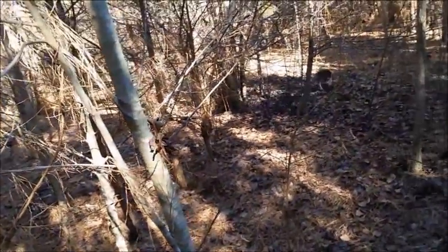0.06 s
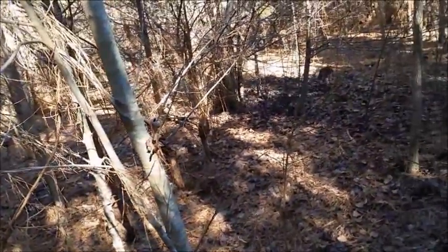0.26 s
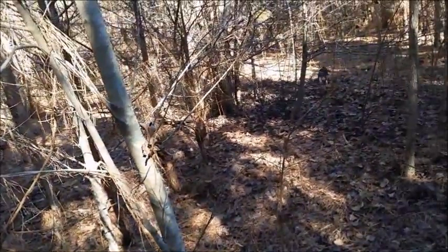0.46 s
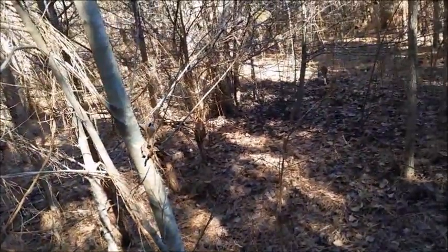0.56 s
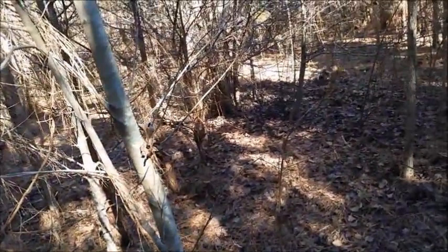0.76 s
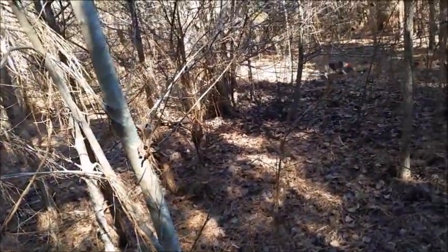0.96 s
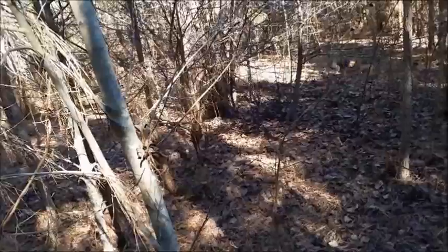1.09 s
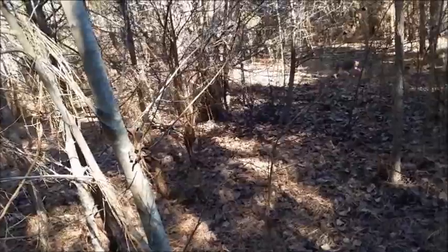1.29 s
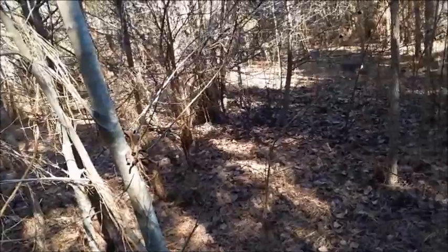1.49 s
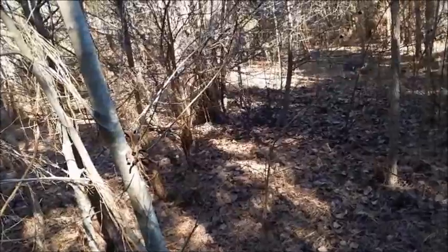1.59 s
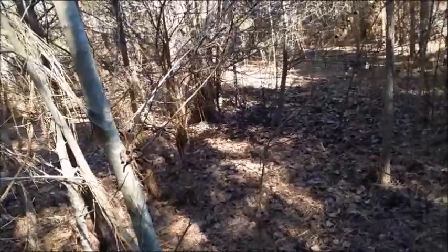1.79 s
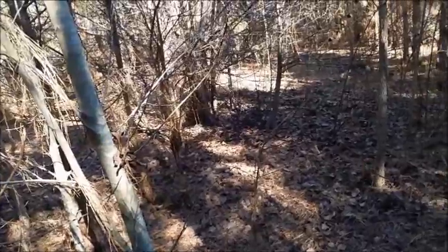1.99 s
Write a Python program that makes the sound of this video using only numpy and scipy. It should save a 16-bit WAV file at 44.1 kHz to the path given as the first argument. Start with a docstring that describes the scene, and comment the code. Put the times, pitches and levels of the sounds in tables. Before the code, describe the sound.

A young hound bays high and slightly hoarse, then again shorter, some way off among trees with a thin echo; dry leaves and clothing rustle close to a hand-held stereo microphone, then two low taps on its right.

```python
"""Young hound baying in an open wood

A young hound bays twice, some way off; each bay is harmonics on a gliding pitch, roughened by a
second oscillation, and the trunks return a thin echo made of decaying noise. Dry leaves and clothing
rustle close by as crackles over hiss. Shaped noise gives insects on the left, far traffic and wind
rumble, and faint air. A finger taps the right of the hand-held recorder: short low sagging tones.
Soft thumps, a lower swish and a thin whistle pass briefly."""
import sys
import numpy as np
from scipy import signal
from scipy.fft import rfft, irfft, next_fast_len
from scipy.io import wavfile
from scipy.ndimage import map_coordinates

SR = 44100
rng = np.random.default_rng(int(sys.argv[2]) if len(sys.argv) > 2 else 0)


def gain_from_db(level_db):
    """Turn a decibel level (scalar or array-like) into a linear amplitude factor."""
    decades = np.asarray(level_db, float) / 20
    return 10 ** decades


def master_out(mix):
    """Clip the mix to full scale and print it as 16-bit PCM to the path in sys.argv[1]."""
    frames = np.transpose(np.atleast_2d(mix))
    ceiling = np.clip(frames, -1, 1)
    pcm = np.round(ceiling * 32767).astype(np.int16)
    wavfile.write(sys.argv[1], SR, pcm)


N = 90404
T = np.arange(N) / SR


def unit(x):
    """Scaled to rms 1."""
    return x / np.sqrt(np.mean(x ** 2) + 1e-20)


def along(points, hz):
    """Value at hz from (Hz, value) points on a log axis."""
    f, v = np.transpose(points)
    return np.interp(np.log(hz + 1), np.log(f + 1), v)


def curves(rows):
    """One value per sample for each column after the time."""
    s, *cols = np.transpose(rows)
    return [np.interp(T, s, c) for c in cols]


def wobble(rate):
    """A smooth random curve, rate knots a second."""
    return map_coordinates(rng.standard_normal(N // 20), [T * rate])


def bump(s, half):
    """A flat-topped swell of height 1 around a moment."""
    return np.exp(-((T - s) / half) ** 4)


def noise():
    """White noise, independent left and right."""
    return rng.standard_normal((2, N))


def coloured(x, spectrum):
    """x through (Hz, dB) points, brought to rms 1."""
    m = next_fast_len(N + 8192)
    gain = gain_from_db(along(spectrum, np.fft.rfftfreq(m, 1 / SR)))
    return unit(irfft(rfft(x, m) * gain, m)[..., :N])


def delayed(x, seconds):
    """x later by any fraction of a sample."""
    m = next_fast_len(N + 8192)
    turn = np.exp(-2j * np.pi * np.fft.rfftfreq(m, 1 / SR) * seconds)
    return irfft(rfft(x, m) * turn, m)[..., :N]


def pair(a, b, alike):
    """Left and right from two noises, with the given likeness."""
    u = np.arccos(np.clip(alike, -1, 1)) / 2
    return np.array([np.cos(u) * a + np.sin(u) * b, np.cos(u) * a - np.sin(u) * b])


def fade_db():
    """The slow fall shared by the background beds, ending at 0 dB."""
    return -2.5 * (T - T[-1])  # dB per second


# colour of the air all around: hz [Hz], density_db [dB per Hz, relative]
AIR_COLOUR = [(150, -44), (300, -3), (900, -13.5), (5400, -18), (6200, -50), (9300, -50.5), (10800, -13.5)]


def air():
    """Wide faint hiss: separate shaped noise at each microphone."""
    return gain_from_db(-61.5 + fade_db()) * coloured(noise(), AIR_COLOUR)


# colour of the far traffic and wind: hz [Hz], density_db [dB per Hz, relative]
RUMBLE_COLOUR = [(10, -24.5), (60, -9.5), (100, -3.5), (150, -15.5), (320, -29), (600, -55.5), (1500, -80)]


def rumble():
    """Low noise partly shared by both sides; the left drifts slowly, the right flickers."""
    both = pair(*coloured(noise(), RUMBLE_COLOUR), alike=.45)
    unsteady_db = 1.3 * np.array([wobble(4.3), wobble(45)])
    return both * gain_from_db(-51.5 + fade_db() + unsteady_db)


# colour of the insects off to the left: hz [Hz], density_db [dB per Hz, relative]
INSECT_COLOUR = [(2200, -60.5), (2950, -12), (3400, -5.5), (4150, -2), (4700, -12), (6000, -68.5)]


def insects():
    """A band of noise, 16.5 dB weaker at the right microphone, with a slow waver."""
    hiss = coloured(noise(), INSECT_COLOUR) * gain_from_db([[0], [-16.5]])
    return hiss * gain_from_db(-58 + fade_db() + 1.1 * wobble(7))


# soft low thumps: middle_s [s], level_db [dB], pitch_hz [Hz], half_length_s [s]
THUMP_EVENTS = [(0.069, -49.5, 310, 0.0085), (1.036, -34, 190.8, 0.01)]


def thumps():
    """A few cycles of a low tone, stronger at the right microphone."""
    mono = sum(gain_from_db(db) * bump(s, half) * np.sin(2 * np.pi * hz * T)
               for s, db, hz, half in THUMP_EVENTS)
    return gain_from_db([[-4], [0]]) * mono


# finger on the right of the case: start_s [s], level_db [dB, before the soft onset],
# pitch_hz [Hz, once settled]
TAP_EVENTS = [(1.4277, -16, 102), (1.6759, -20, 117)]
GLIDE, GLIDE_S = 3.44, 0.0013  # extra pitch at the start, as a share of the settled one; its decay, s
TAP_T60_S, TAP_ONSET_S = 0.045, 0.0011


def taps():
    """Each tap rings the case low and short, starting sharp and sagging in pitch."""
    out = np.zeros(N)
    for s, db, hz in TAP_EVENTS:
        t = np.clip(T - s, 0, None)
        turns = hz * (t + GLIDE * GLIDE_S * (1 - np.exp(-t / GLIDE_S)))
        onset = 1 - np.exp(-(t / TAP_ONSET_S) ** 2)
        out += gain_from_db(db - 60 * t / TAP_T60_S) * onset * np.sin(2 * np.pi * turns)
    return out * gain_from_db([[-44], [0]])  # left, right, dB


# thin whistle on the left: middle_s [s], half_length_s [s], pitch_hz [Hz], level_db [dB]
WHISTLE_EVENT = (.55, .035, 10600, -52)


def whistle():
    """A brief sine of slightly wandering pitch, at the left microphone only."""
    s, half, hz, db = WHISTLE_EVENT
    tone = np.sin(2 * np.pi * np.cumsum(hz + 40 * wobble(60)) / SR)
    return gain_from_db(db) * bump(s, half) * tone * np.array([[1], [0]])


# colour of the swish: hz [Hz], density_db [dB, relative]
SWISH_SPECTRUM = [(7800, -58.5), (8400, -7.5), (11000, -9.5), (12500, -44.5)]
# the swish towards the left: middle_s [s], half_length_s [s], level_db [dB, left]
SWISH_EVENT = (0.5, .16, -53.5)


def swish():
    """One swell of shaped noise, lower than the leaves and 8 dB weaker on the right."""
    s, half, db = SWISH_EVENT
    return gain_from_db(db) * bump(s, half) * coloured(noise(), SWISH_SPECTRUM) * gain_from_db([[0], [-8]])


# colour of dry leaves close to the microphones: hz [Hz], density_db [dB per Hz, relative]
LEAF_COLOUR = [(8000, -84), (9400, -23), (10400, -5.5), (14000, -1.5)]
# louder leaf snaps: start_s [s], level_db [dB, at the onset, before colouring]
SNAP_EVENTS = [(.608, -42), (1.619, -33)]


def snaps():
    """Sudden noise bursts in the colour of leaves, 60 dB down after 5.8 ms, alike on both sides."""
    sudden = sum(gain_from_db(db - 60 * np.abs(T - s) / 0.0058) * (T >= s) for s, db in SNAP_EVENTS)
    bursts = sudden * rng.standard_normal(N)
    return coloured(bursts, LEAF_COLOUR) * bursts.std()


# movement in the leaves and clothing: time_s [s], strength_db [dB]
MOVEMENT = [(0, -78.5), (.025, -53), (.19, -42.5), (.215, -59), (.26, -38), (.36, -40.5), (.63, -41.5),
            (.655, -46), (.76, -75.5), (.79, -46), (.83, -42.5), (.89, -44.5), (.915, -36), (.97, -43),
            (1.22, -49.5), (1.25, -74), (1.33, -68.5), (1.37, -57.5), (1.45, -72), (1.63, -46.5),
            (1.7, -51.5), (1.76, -76.5), (1.84, -53.5), (1.93, -59), (2.05, -83.5)]
CRACKLES_PER_S, CRACKLE_SPREAD_DB, CRACKLE_DB = 1500, 2.5, -3  # crackle level is relative to the hiss
FLICKER_DB, LEFT_LAG_S = 2.2, .00011


def leaves():
    """Dense crackles over a hiss, both following the movement, plus the louder snaps."""
    sizes = gain_from_db(CRACKLE_SPREAD_DB * rng.exponential(size=(2, N))) * noise()
    crackle = unit(sizes * (rng.random((2, N)) < CRACKLES_PER_S / SR))
    a, b = coloured(noise() + gain_from_db(CRACKLE_DB) * crackle, LEAF_COLOUR)
    strength_db, = curves(MOVEMENT)
    flicker_db = FLICKER_DB * (wobble(28) + wobble(120))
    left, right = gain_from_db(strength_db + flicker_db) * pair(a, b, .45) + snaps()
    return np.array([delayed(left, LEFT_LAG_S), right])


# harmonics of the voice: multiple [x pitch], level_db [dB, fundamental at 0],
# mouth_share [share of the mouth opening it follows]
HARMONICS = [(2, -4, 0.84), (3, -2.5, 0.72), (4, -27, 1), (5, -42, 0.67)]
# the tongue shifts and lets the third harmonic through in patches: time_s [s], gain_db [dB]
TONGUE_SHIFTS = [(.265, -10), (.285, -25.5), (.37, -20), (.385, -9.5), (.44, -21), (.57, -16.5),
                 (.585, -15.5), (.9, -51), (.93, -18.5)]
# partials when alternate cycles differ: multiple [x pitch],
# level_db [dB under the fundamental, at strength 1]
HALF_PARTIALS = [(.5, -37), (1.5, -25), (2.5, -30.5)]
# colour of the breath rasp: hz [Hz], density_db [dB, relative]
RASP_COLOUR = [(250, -38.5), (520, -23.5), (735, -11.5), (1700, -16.5), (2600, -24.5), (4500, -100)]
# the second oscillation alone: middle_s [s], half_length_s [s], level_db [dB]
FLARE_EVENTS = [(0.231, 0.0076, -34.5), (0.58, 0.017, -27.5)]
FLUTTER_SWELL, FLUTTER_BEND_RAD, SECOND_WANDER_HZ = .75, .55, 25
JITTER_RATE, JITTER_RAD, SHIMMER = 239.7, 0.17, 0.35  # rate in knots per second
SLACK_HZ, SLACK_DB_PER_HZ = 600, .15  # below this pitch the slack folds lose upper overtones
OVERTONE_WAVER_DB = .7  # unsteadiness per step up the series
HALF_S, HALF_LENGTH_S, HOARSE_HALF = .335, 0.062, 2.16  # alternating stretch; share from hoarseness
RASP_DB = -11  # breath noise at hoarseness 1, under the fundamental


def bay(rows, second_hz):
    """Harmonics on the pitch; hoarseness brings flutter, shaking and breath noise."""
    hz, level_db, mouth_db, hoarse = curves(rows)
    pitch_phase = 2 * np.pi * np.cumsum(hz) / SR
    # phase of the second oscillation relative to the voice
    beat = 2 * np.pi * np.cumsum(second_hz + SECOND_WANDER_HZ * wobble(25) - hz) / SR
    bend = FLUTTER_BEND_RAD * np.sin(beat) + JITTER_RAD * wobble(JITTER_RATE)
    phase = pitch_phase + hoarse * bend
    swell = 1 + hoarse * (FLUTTER_SWELL * np.cos(beat) + SHIMMER * wobble(JITTER_RATE))

    tone = swell * np.sin(phase)
    slack_db = SLACK_DB_PER_HZ * np.clip(SLACK_HZ - hz, 0, None)
    tongue_db, = curves(TONGUE_SHIFTS)
    for k, db, share in HARMONICS:
        harmonic_db = db + share * mouth_db - (k > 2) * slack_db + (k == 3) * tongue_db
        waver_db = OVERTONE_WAVER_DB * (k + 3.5) * wobble(25)
        tone += gain_from_db(harmonic_db + waver_db) * np.cos(k * phase)

    alternating = bump(HALF_S, HALF_LENGTH_S) + HOARSE_HALF * hoarse
    tone += alternating * sum(gain_from_db(db + 3.8 * wobble(27)) * np.sin(k * phase)
                              for k, db in HALF_PARTIALS)
    rasp = gain_from_db(RASP_DB) * hoarse * coloured(rng.standard_normal(N), RASP_COLOUR)
    flare = sum(gain_from_db(db) * bump(s, half) for s, half, db in FLARE_EVENTS
                if rows[0][0] < s < rows[-1][0])
    second = np.sin(pitch_phase + beat)
    return gain_from_db(level_db) * (np.sqrt(2) * tone + rasp) + np.sqrt(2) * flare * second


# the trunks' echo by frequency: hz [Hz], t60_s [s], echo_db [dB]
TRUNKS = [(650, 0.44, -15), (1290, 0.62, -15.5), (1900, 0.53, -17), (2600, 0.63, -8.5)]


def wood_echo(voice):
    """Trunks scatter the voice: convolution with noise whose decay and level vary with frequency."""
    hz, t, z = signal.stft(rng.standard_normal((2, SR)), SR, nperseg=256)
    t60, echo_db = (along([(row[0], row[k]) for row in TRUNKS], hz)[:, None] for k in (1, 2))
    decay = gain_from_db(-60 * t / t60)
    decay /= np.linalg.norm(decay, axis=1, keepdims=True)
    tail = signal.istft(z * gain_from_db(echo_db) * decay, SR, nperseg=256)[1]
    echo = signal.fftconvolve(voice[None], tail / np.sqrt(128), axes=1)[:, :N]
    return delayed(echo, 0.025)


# one list per bay, rows: time_s [s], pitch_hz [Hz], level_db [dB],
# mouth_db [dB, opening: overtones over fundamental], hoarseness [0 clear, 1 hoarse]
BAY_ROWS = [
    [(.195, 540, -99, -42, 0.1), (.215, 559.3, -37, -13, 1.11), (.248, 594.1, -25.5, -7, 0.4),
     (.272, 650.6, -17, -6, 0.15), (.308, 660.3, -17, -3.5, 0.05), (.322, 677, -14.5, -14, 0.64),
     (.34, 660, -17.5, -2.5, 0.07), (.39, 643.2, -16, -8, 0.05), (.415, 660.6, -14, -12, 0.05),
     (.435, 650.6, -15, -5.5, 0.41), (.457, 663, -16.5, -8.5, 0.1), (.48, 651.6, -14.5, -12.5, 0.45),
     (.495, 655, -13.5, -9.5, .15), (.516, 650, -19, -4.5, 0.38), (.527, 629.4, -23, 13.5, 0.07),
     (.562, 622.9, -33, 19, 0), (.578, 603, -35.5, 17, 0), (.631, 628, -55.5, 30, 0),
     (.649, 372, -69.5, 41, 0.15), (.675, 362, -96, 44.5, 0.2), (.69, 360, -130, 27.5, 0)],
    [(.838, 590, -99, -63, 0.17), (.855, 598, -23.5, -19.5, 0.22), (.875, 582, -22.5, -17, 0.2),
     (.888, 628, -21, -6, .55), (.914, 618.4, -22, -6.5, .5), (.926, 635, -21.5, 1.5, 0.02),
     (.965, 641.2, -23, 3.5, 0.1), (.982, 634.7, -33, 12, 0.1), (.995, 589.3, -26, -9, .1),
     (1.008, 400, -55, 26.5, .3), (1.03, 300, -98.5, 18, .3)],
]
# second oscillation in the larynx, which beats with the voice: pitch_hz [Hz], one per bay
LARYNX_HZ = [718, 543.3]
# bearing of the hound: left_over_right_db [dB], one per bay
BEARING_DB = [1.5, 0.3]


def hound():
    """Both bays from some way off, direct and returned by the trunks."""
    bays = [bay(rows, hz) for rows, hz in zip(BAY_ROWS, LARYNX_HZ)]
    left, right = sum(gain_from_db([[db / 2], [-db / 2]]) * b for b, db in zip(bays, BEARING_DB))
    direct = np.array([delayed(left, .00009), right])  # the right microphone hears it first
    return direct + wood_echo(sum(bays))


def scene():
    """Everything at the two microphones."""
    background = air() + rumble() + insects()
    handling = thumps() + taps()
    close_by = whistle() + swish() + leaves()
    return background + handling + close_by + hound()


def low_pass(x):
    """Removes everything above the highest recorded frequency."""
    return signal.sosfilt(signal.butter(12, 15800, fs=SR, output="sos"), x)


def record(dry):
    """The recorder keeps nothing above its band limit of 14620 Hz."""
    kept = irfft(rfft(dry) * (np.fft.rfftfreq(N, 1 / SR) < 14620), N)
    return low_pass(kept)


dry = scene()
out = record(dry)
master_out(out)
```